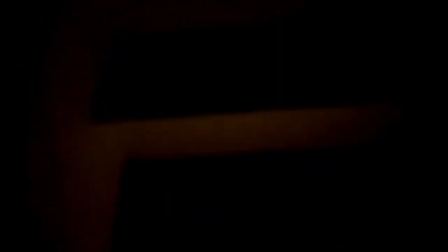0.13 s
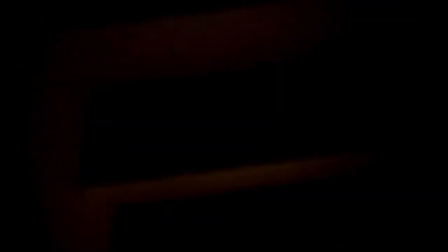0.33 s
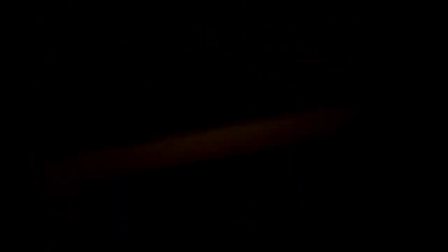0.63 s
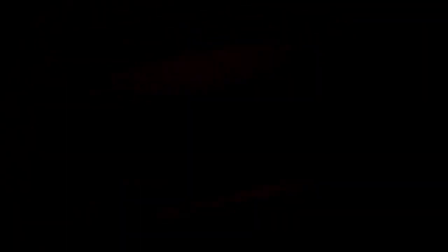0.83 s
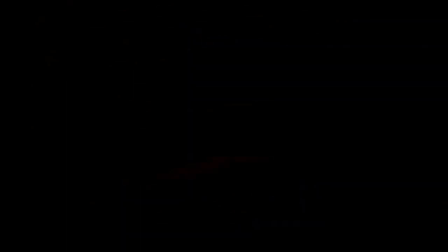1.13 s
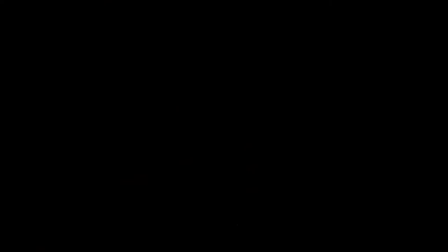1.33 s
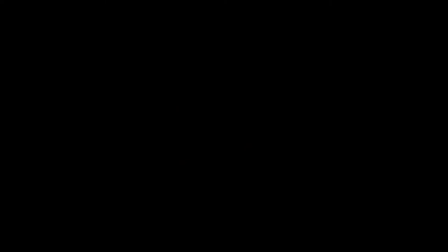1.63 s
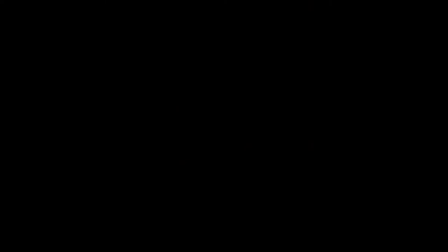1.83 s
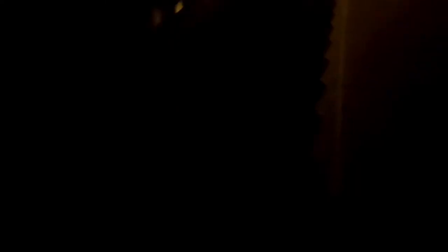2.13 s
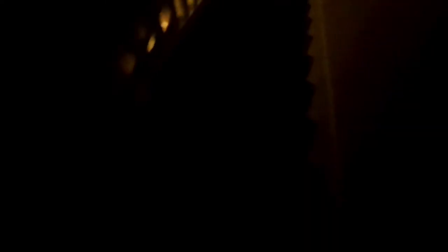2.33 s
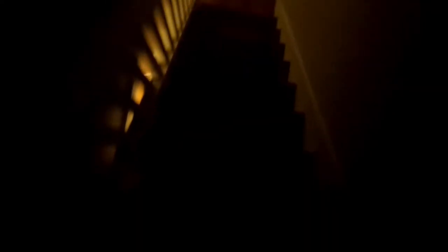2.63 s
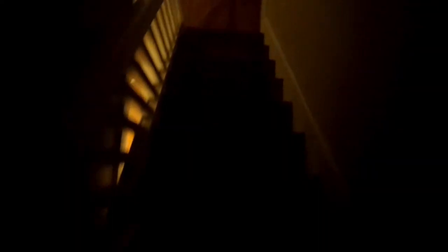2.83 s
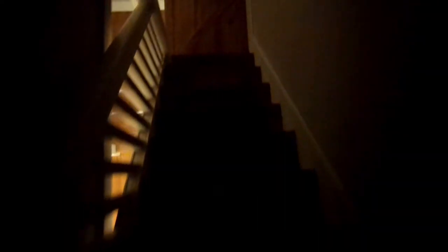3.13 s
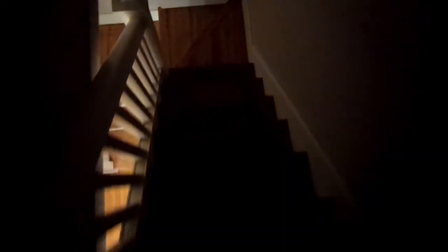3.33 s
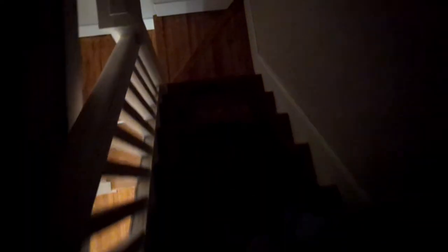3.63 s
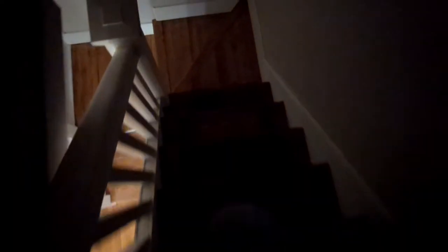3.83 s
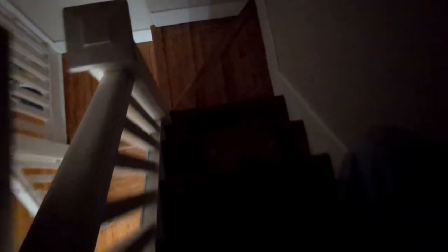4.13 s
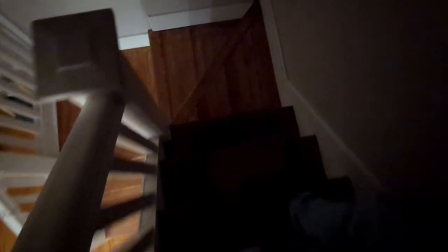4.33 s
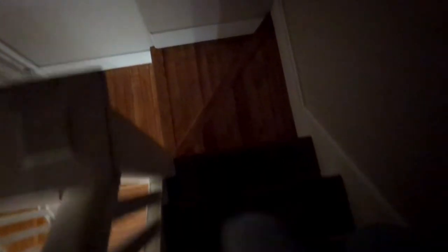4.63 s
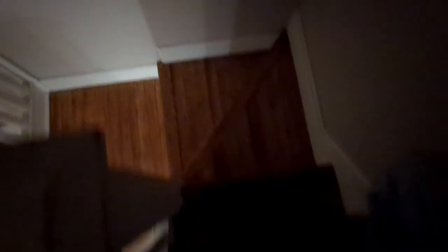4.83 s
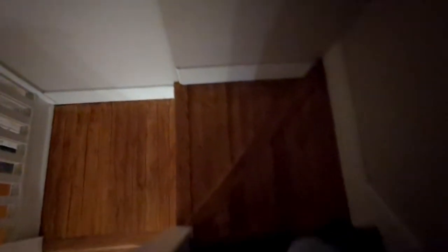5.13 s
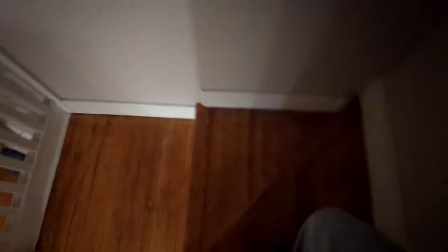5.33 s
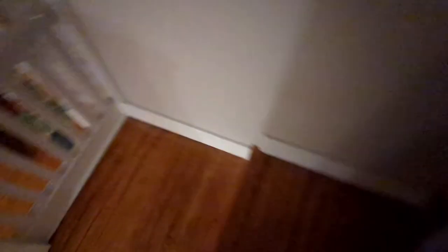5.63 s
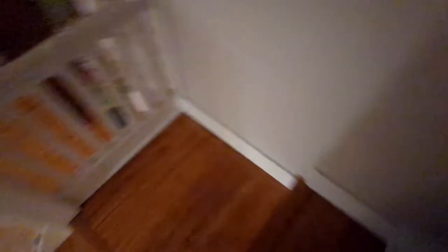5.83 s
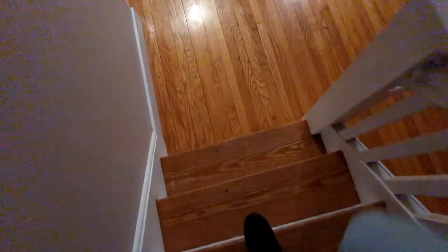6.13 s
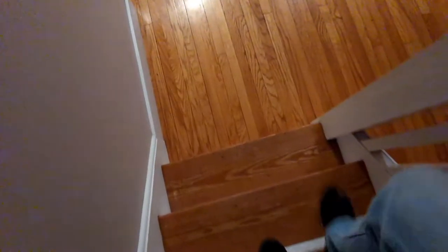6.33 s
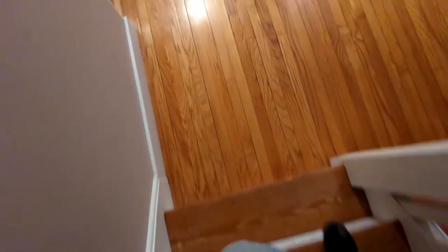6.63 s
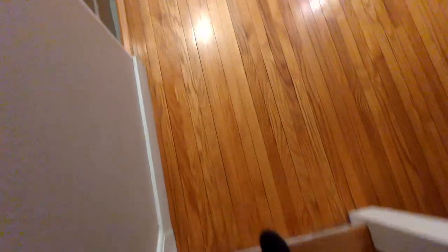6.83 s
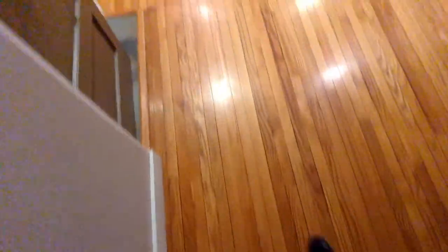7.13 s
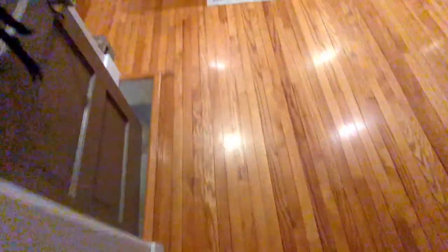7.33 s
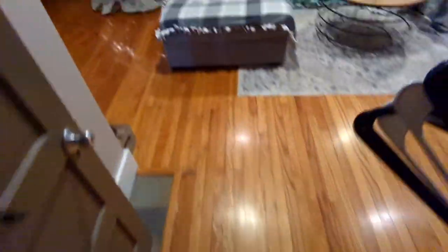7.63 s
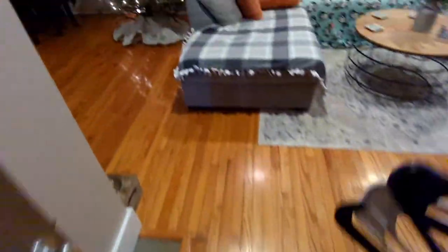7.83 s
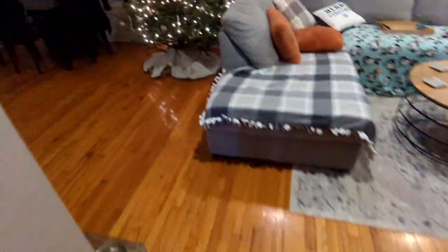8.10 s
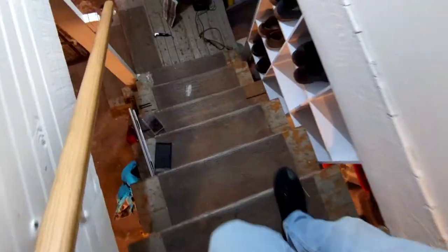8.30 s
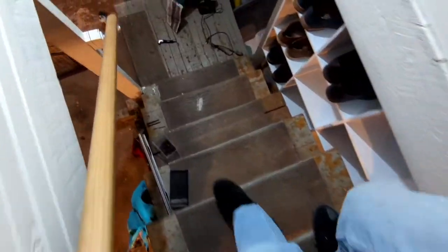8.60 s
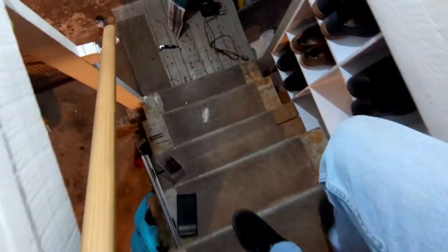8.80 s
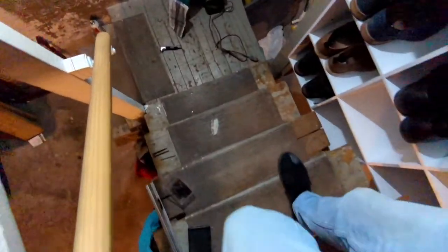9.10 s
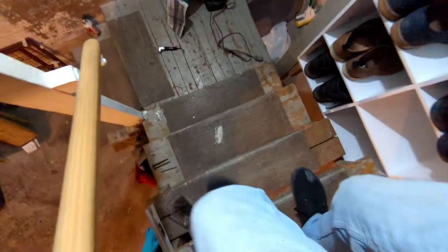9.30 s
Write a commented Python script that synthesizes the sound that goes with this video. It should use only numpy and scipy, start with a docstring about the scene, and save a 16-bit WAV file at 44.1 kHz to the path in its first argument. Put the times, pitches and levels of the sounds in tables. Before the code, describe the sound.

Someone in soft-soled shoes hurries down wooden stairs inside a house. Irregular heel and toe knocks ring hollow boards over low thuds, with gritty scuffs and small sole clicks. A hard cut brings brief near-silence, then more steps, a loud slap with a tiny rubber squeak on the floor, another cut, and faint treads with trouser swishes. Head-worn stereo microphone, short stairwell echo.

```python
"""Hurrying down wooden stairs

Someone in soft shoes hurries down wooden stairs and over a boarded floor, a small stereo camera on the head.
Heels and toes ring damped tread, frame and joist modes; sole edges click; grit and bumps make the drag.
A squeak, trouser swishes and coloured house noise are added, and sparse taps form the stairwell's echo.
Two hard edits join three shots, each with its own background, and cut the echo off."""
import sys
import numpy as np
from scipy import signal
from scipy.fft import rfft, irfft, next_fast_len
from scipy.io import wavfile
from scipy.ndimage import uniform_filter1d

SR = 44100
rng = np.random.default_rng(int(sys.argv[2]) if len(sys.argv) > 2 else 0)


def natural_amplitude(level_db):
    """Convert a level in decibels to a linear amplitude factor, elementwise."""
    exponent = np.asarray(level_db, float) / 20
    return 10 ** exponent


def wav_record(signal):
    """Record a signal, one row per channel, as 16-bit PCM in the file named by sys.argv[1]."""
    frames = np.transpose(np.atleast_2d(signal))
    bounded = np.clip(frames, -1, 1)
    # unit amplitude maps onto the largest positive 16-bit level
    quanta = np.round(bounded * 32767).astype(np.int16)
    wavfile.write(sys.argv[1], SR, quanta)


N = 417186  # length in samples

# All source levels are set ahead of the microphone's colour and the final rounding of peaks.
# Heels and toes landing: start_s, knock_db, thud_db, tread_pitch_hz, frame_share_db [s, dB, dB, Hz, dB]
FOOTFALLS = [(0.002, -12, -26, 195, 5), (0.298, -21, -31, 306, 0), (0.35, -48, -47, 392, -1),
             (0.483, -11.5, -16, 153, 5), (0.523, -7.5, -33, 149.3, 3.5), (0.724, -28, -40, 133, 4),
             (0.743, -30, -25, 240, 0.5), (0.915, -28.5, -36, 130, -3), (0.95, -13, -41, 360, 0),
             (0.99, -31, -23, 360, -3.5), (1.073, -22, -26, 172, 2.5), (1.439, -20, -42, 193, 1),
             (1.485, -30, -17.5, 262, 4), (1.56, -17.5, -26, 174, 0), (1.938, -46, -54, 133, -15),
             (1.963, -17, -50, 202.6, -12), (2.252, -32, -51, 136.3, -14), (2.33, -31.5, -48, 346, 3.5),
             (2.704, -30, -45, 228, -4), (2.843, -37, -58, 265, -5), (2.977, -27, -44, 358, 2),
             (3.115, -17.5, -39, 240, 2), (3.373, -12.5, -37, 312, -1), (3.382, -15, -32, 238, -1),
             (3.454, -32, -48, 314, 0), (3.712, -11, -23, 176.4, -8), (3.734, -17, -21, 173, -2.5),
             (3.844, -23, -31, 188.5, -4.5), (4.046, -10.5, -23, 163, 10), (4.062, -17, -31, 172, -1),
             (4.133, -21, -33, 312, 6), (4.29, -46, -36, 438, -0.5), (4.439, -16, -46, 172, -3.5),
             (4.506, -18, -23, 222, -4), (4.714, -29.5, -56, 223, 3), (4.79, -18, -34, 228, 1),
             (4.939, -27.5, -46, 348, 1.5), (5.151, -12, -43.5, 411, -8), (5.286, -36, -38, 129, 5),
             (5.579, -10.5, -29, 140.5, 5), (5.655, -42, -37, 214, -4.5), (5.822, -38, -63, 357, 2),
             (6.026, -37.5, -48, 430, -5), (6.133, -12.5, -33, 182, 3), (6.175, -16.5, -22, 335, -0.5),
             (6.248, -25.5, -40, 161, -2.5), (6.358, -22.5, -56, 183, -3), (6.426, -25, -50, 165, 10),
             (6.447, -24, -45, 192, 0), (6.511, -11.5, -33, 287, 5), (6.609, -18.5, -25, 165, 14),
             (6.801, -31.5, -57, 172, 13), (6.894, -17.5, -41, 177, 0), (6.961, -21, -27, 173, 19),
             (7.316, -15, -22, 260, 7.5), (7.411, -30, -25, 395, 2), (7.687, -33.5, -55, 199, -10),
             (7.722, -35, -55, 194, -5), (7.787, -52, -18, 135, -8), (7.837, -36, -23, 131, -1),
             (7.983, -50, -36, 176, 15), (8.242, -39, -53, 201, -12), (8.276, -25, -27, 422, 1),
             (8.34, -47, -41, 335, 8), (8.43, -30, -30, 142, 9), (8.676, -18.5, -54, 403, 3),
             (8.909, -43, -54, 334, 3), (9.092, -23, -35, 419, 2.5), (9.403, -31, -48, 133, 7)]
# Modes of a wooden tread: pitch_multiple, level_db [ratio, relative dB]
TREAD_MODES = [(0.801, -5), (1.002, 1), (1.469, -9.5), (2.1, -5.5), (2.9, -13.5), (4.1, -11.5)]
# Deep mode of the joists under the walker: time_s, pitch_hz [s, Hz]
JOIST_PITCH = [(0, 87), (5.4, 94.3), (5.6, 69), (7.6, 54), (8.2, 62), (9.46, 73)]


def evened(x):
    """Scales a sound to rms 1."""
    return x / np.sqrt(np.mean(x ** 2) + 1e-20)


def read(points, hz):
    """Joins (Hz, value) points on a log-frequency axis."""
    point_hz, value = np.transpose(points)
    return np.interp(np.log(hz + 1), np.log(point_hz + 1), value)


def add(mix, start_s, sound):
    """Mixes a sound of matching channels in at start_s, trimmed at the end of the mix."""
    part = mix[:, round(start_s * SR):][:, :sound.shape[1]]
    part += sound[:, :part.shape[1]]


def coloured(x, points):
    """Filters x by a spectral curve of (Hz, dB) points."""
    size = next_fast_len(x.shape[-1])
    gain = natural_amplitude(read(points, np.fft.rfftfreq(size, 1 / SR)))
    return irfft(rfft(x, size) * gain, size)[..., :x.shape[-1]]


def paired(a, b):
    """Two spaced microphones: alike in the bass, nearly unrelated in the treble."""
    # frequency_hz, left_right_likeness [Hz, correlation -1 to 1]
    likeness = [(60, 0.99), (150, 0.99), (300, 0.84), (640, 0.46), (1300, -0.13), (2500, -0.071),
                (15000, 0.07)]
    size = next_fast_len(len(a))
    same = np.clip(read(likeness, np.fft.rfftfreq(size, 1 / SR)), -1, 1)
    other = same * rfft(a, size) + np.sqrt(1 - same ** 2) * rfft(b, size)
    return np.array([a, irfft(other, size)[:len(a)]])


def placed(sound, pan_db):
    """The nearer microphone hears the sound louder and first; the bass stays central in level."""
    lag = int(np.clip(2.5 * pan_db, -16, 16)) // 2  # samples each way
    padded = np.r_[np.zeros(8), sound]
    sides = np.array([np.roll(padded, shift) for shift in (-lag, lag)])
    bass = uniform_filter1d(sides, size=120)
    return bass + (sides - bass) * natural_amplitude(np.array([[pan_db / 2], [-pan_db / 2]]))


def resonate(x, hz, width_hz):
    """One damped mode, ringing as a sine; a wider mode dies sooner."""
    radius, turn = np.exp(-np.pi * width_hz / SR), 2 * np.pi * hz / SR
    feedback = [1, -2 * radius * np.cos(turn), radius * radius]
    return width_hz * signal.lfilter([0, np.sin(turn)], feedback, x)


def following(x, hz, width_hz):
    """A noisy band around a moving pitch: shifted to zero, low-passed, shifted back, rms 1."""
    turn = np.exp(2j * np.pi * np.cumsum(hz) / SR)
    lowpass = signal.butter(2, width_hz / 2, fs=SR, output="sos")
    return evened((turn * signal.sosfilt(lowpass, x / turn)).real)


def microphone(x):
    """Cuts the bass and adds the small resonances of the microphone housing."""
    # resonance_hz, width_hz, lift_db [Hz, Hz, dB]
    ports = [(2020, 190, 1), (4270, 260, 3), (6250, 990, 3.5), (11960, 1240, 2)]
    size = next_fast_len(N)
    hz = np.fft.rfftfreq(size, 1 / SR)
    lift = natural_amplitude(sum(db / (1 + (2 * (hz - f) / width) ** 2) for f, width, db in ports))
    x = signal.sosfilt(signal.butter(3, 73.7, "high", fs=SR, output="sos"), x)  # Hz
    return irfft(rfft(x, size) * lift, size)[..., :N]


def hush(shot):
    """House air and microphone hiss: noise with the spectrum of one shot, its level drifting."""
    # One curve for each shot: frequency_hz, density_db [Hz, relative dB per Hz]
    spectra = [
        [(15, -48), (25, -16), (87, -1), (270, -21), (405, -8.5), (1070, -19), (2050, -18.5), (3720, -30),
         (12200, -36), (16000, -37)],
        [(15, -48), (25, 17.5), (82, 2.5), (141, -3), (223, -16), (516, -4.5), (1040, -15), (2000, -20.5),
         (3520, -25), (9570, -32.5), (12200, -30.5), (16000, -33)],
        [(15, -39), (25, 4), (64, 9), (97, 1), (145, -7), (285, -20), (463, -19), (1190, -20.5), (2000, -49),
         (3620, -36), (12200, -37.5), (16000, -41)],
    ]
    # Background rms: time_s, level_db [s, dB]
    levels = [(0, -48), (1.98, -58), (2, -61), (2.24, -54.5), (2.9, -53.5), (5, -47.5), (8.1, -50.5),
              (8.2, -60), (8.3, -44.5), (9.46, -44.5)]
    air = evened(coloured(paired(*rng.standard_normal((2, N))), spectra[shot]))
    return natural_amplitude(np.interp(np.arange(N) / SR, *np.transpose(levels))) * air


def stairwell():
    """An echo of sparse taps of random sign, each frequency band dying at its own speed."""
    # frequency_hz, decay_t60_s [Hz, s to fall 60 dB]
    decay = [(80, 0.3), (250, 0.16), (700, 0.24), (2000, 0.32), (6000, 0.08), (14000, 0.42)]
    taps = np.zeros((2, SR // 2))
    at = np.arange(150, SR // 2 - 20, 20)
    at = at + rng.integers(0, 20, (2, len(at)))
    np.put_along_axis(taps, at, rng.choice([-1., 1.], at.shape), 1)
    hz, t, bands = signal.stft(paired(*taps), SR, nperseg=512)
    fading = bands * natural_amplitude(-60 * t / read(decay, hz)[:, None])
    tail = signal.istft(fading, SR, nperseg=512)[1]
    return tail / np.linalg.norm(tail[0])


def swish(length_s, level_db, low_hz, noise):
    """A soft puff of high noise, unlike in the two microphones, under a smooth hump."""
    highpass = signal.butter(2, low_hz, "high", fs=SR, output="sos")
    puff = signal.sosfilt(highpass, noise)[:, :round(length_s * SR)]
    return natural_amplitude(level_db) * evened(puff) * np.hanning(puff.shape[1])


def trouser_swishes():
    """Trouser legs brush past each other in short puffs of noise."""
    # start_s, length_s, level_db (rms ahead of the hump), low_hz [s, s, dB, Hz]
    puffs = [(8.359, 0.13, -54.5, 3000), (8.483, .05, -55, 2500), (8.77, .07, -56, 9000),
             (9.171, 0.089, -55.5, 3500)]
    layer = np.zeros((2, N))
    for (start_s, *settings), noise in zip(puffs, rng.standard_normal((len(puffs), 2, 8192))):
        add(layer, start_s, swish(*settings, noise))
    return layer


def squeak():
    """Rubber sticks and slips on varnish: a short gliding tone with two overtones."""
    # time_s, pitch_hz, level_db (rms of the fundamental) [s, Hz, dB]
    glide = [(7.27, 1290, -66), (7.285, 1350, -60), (7.305, 1300, -48), (7.318, 1330, -46)]
    s, hz, db = np.transpose(glide)
    t = np.arange(s[0], s[-1], 1 / SR)
    turns = 2 * np.pi * np.cumsum(np.interp(t, s, hz)) / SR
    tone = np.sin(turns) + 0.15 * np.sin(2 * turns) + 0.2 * np.sin(3 * turns)
    tone = np.sqrt(2) * natural_amplitude(np.interp(t, s, db)) * tone * signal.windows.tukey(len(t), 0.4)
    layer = np.zeros((2, N))
    add(layer, s[0], np.outer([1, 1], tone))
    return layer


def click(peak_db, bright, fade_s, pan_db, noise):
    """A crack of noise, between a dull slap and a hard tick, dying exponentially."""
    # Both curves: frequency_hz, density_db [Hz, relative dB per Hz]
    dull_slap = [(300, -40.5), (600, 5.5), (1000, 1.5), (2000, 6.5), (3000, -9), (5000, -36),
                 (16000, -38.5)]
    hard_tick = [(600, -19), (1500, -10), (3000, -2), (6000, -6), (10000, -11.5), (16000, -17.5)]
    t = np.arange(len(noise)) / SR
    slap, tick = evened(coloured(noise, dull_slap)), evened(coloured(noise, hard_tick))
    crack = (1 - bright) * slap + bright * tick
    crack = crack * np.exp(-t / fade_s) * (1 - np.exp(-t / 0.0004))  # 0.4 ms attack
    return placed(natural_amplitude(peak_db) * crack / abs(crack).max(), pan_db)


def sole_clicks():
    """The edges of the soles click in brief cracks."""
    # start_s, peak_db, brightness, fade_s, left_minus_right_db [s, dB, 0-1, s, dB]
    edges = [(0.1271, -27.5, 0.1, 0.0046, -4), (0.2907, -32, 0.4, 0.007, -2), (0.3496, -31, 0.1, 0.031, -9),
             (0.4953, -35, 0.14, 0.005, -9), (0.7457, -40, 0, 0.0045, -4), (0.952, -30, 0, 0.005, 5),
             (0.992, -24.5, 0.24, 0.025, 2.5), (1.0745, -31, 0, 0.0063, -3.5),
             (1.4346, -51, 0, 0.0044, -12), (1.461, -29.5, 0.15, 0.017, -1.5),
             (1.4823, -27.5, 0.18, 0.0084, 0), (1.939, -28.5, 0.25, 0.0012, -3),
             (1.9609, -21, 0.13, 0.0028, -3.5), (2.3311, -34, 0.07, 0.0048, 3.5),
             (2.7043, -36, 0.3, 0.0043, 4), (2.8434, -37, 0, 0.0081, -4), (2.988, -33, 0.3, 0.0038, -5),
             (3.3722, -12.5, 0.09, 0.003, 2.5), (3.454, -24, 0.24, 0.005, -2),
             (3.4624, -27.5, 0.25, 0.015, 5), (3.52, -31, 0.56, 0.0095, -1.5), (3.712, -17, 0.2, 0.005, 5),
             (3.8449, -29, 0.1, 0.0027, 18), (4.0467, -20.5, 0.08, 0.029, -3.5),
             (4.131, -15.5, 0.13, 0.0044, 3.5), (4.2921, -35, 0.34, 0.0045, -0.5),
             (4.405, -32, 0.7, 0.005, -2.5), (4.4184, -30.5, 1, 0.0077, 6), (4.4998, -16, 0.6, 0.0024, 6.5),
             (4.778, -38, 0.14, 0.0031, -1.5), (4.9387, -25.5, 0.16, 0.0034, 2),
             (5.132, -59, 0.5, 0.0027, -3), (5.153, -38, 0.8, 0.0054, -0.5), (5.2844, -22, 0.73, 0.0026, 4),
             (5.5633, -31, 0.1, 0.0056, 3.5), (5.5757, -27, 0.03, 0.0028, 4),
             (5.6545, -30, 0.5, 0.0049, 3.5), (5.8262, -35, 0.2, 0.0095, 0),
             (6.0247, -39.5, 0.36, 0.0029, -1.5), (6.0751, -48, 0.1, 0.0031, -4),
             (6.1325, -23.5, 0, 0.0041, 2.5), (6.1564, -47, 0.6, 0.0048, 5.5),
             (6.251, -32, 0.3, 0.0023, 14), (6.3587, -31.5, 0.27, 0.0035, 8),
             (6.4462, -38, 0.54, 0.0046, 2), (6.451, -29, 0.43, 0.0024, -2), (6.5066, -30, 0.2, 0.0058, 10),
             (6.8037, -34, 0.12, 0.005, 6), (6.8944, -39, 0.4, 0.005, 7), (6.935, -25, 0.42, 0.0043, 5),
             (6.9593, -23.5, 0.64, 0.004, 3), (7.2095, -52, 0.1, 0.0036, 0.5),
             (7.3173, -12, 0.05, 0.0059, 3.5), (7.4126, -26, 0.04, 0.0078, -2.5),
             (7.683, -57, 0.2, 0.005, -0.5), (7.9189, -36, 0.15, 0.004, 2.5), (7.987, -48, 0.2, 0.0038, 9),
             (8.243, -31.5, 0, 0.006, 2), (8.2751, -29, 0.38, 0.0046, 1), (8.3417, -38, 0.17, 0.0064, -2.5),
             (8.5133, -36.5, 0.94, 0.013, 6.5), (8.6737, -29, 0.07, 0.0047, 3),
             (8.7532, -22.5, 0.88, 0.0022, -5.5), (8.7914, -36, 0.3, 0.005, 3),
             (8.9092, -42, 0.3, 0.0064, 6.5), (9.092, -36, 0.34, 0.004, -2)]
    layer = np.zeros((2, N))
    for (start_s, *settings), noise in zip(edges, rng.standard_normal((len(edges), 2048))):
        add(layer, start_s, click(*settings, noise))
    return layer


def frame(x):
    """The stair frame answers a force with its broad low modes."""
    # pitch_hz, width_hz, level_db [Hz, Hz, relative dB]
    modes = [(172, 25.7, 8.5), (240, 48, 6), (330.7, 23, -1.5), (394, 147, 4.5), (514, 160, -1),
             (650, 96, -13.5)]
    return sum(natural_amplitude(db) * resonate(x, hz, width) for hz, width, db in modes)


def slides(t):
    """Levels in each slide: scrape and fizz rise, rumble falls; then all fade into the shuffle."""
    # Faint shuffle between the steps: time_s, scrape_db, fizz_db, rumble_db [s, dB, dB, dB]
    shuffle = [(0, -64, -73, -48), (1.9, -95, -70, -73), (2.3, -69.5, -73, -71), (3.3, -71, -62, -57),
               (4, -63, -56.5, -55), (5.1, -69, -67, -57), (5.6, -62, -59, -50), (6.1, -59, -63.5, -70),
               (6.5, -73, -63, -48), (7.2, -65, -67.5, -62.5), (7.7, -61, -65.5, -53),
               (8.15, -68, -85, -72), (8.6, -65, -58.5, -63), (9.46, -62, -71.5, -54.5)]
    # A sole sliding and rolling: start_s, length_s, scrape_db, fizz_db (cloth and sole),
    # rumble_db (boards) [s, s, dB, dB, dB], levels as the slide ends
    sliding = [(0.0, 0.022, -37.5, -82, -21.5), (0.11, 0.028, -51, -57, -33), (0.288, 0.032, -50, -53, -35),
               (0.342, 0.022, -44, -51, -38.5), (0.424, 0.023, -43, -56, -40.5),
               (0.481, 0.075, -31.5, -48, -25.5), (0.749, 0.049, -41, -58, -36),
               (0.946, 0.065, -34.5, -47.5, -23), (1.042, 0.065, -45, -55, -38),
               (1.434, 0.046, -43.5, -59, -29), (1.493, 0.06, -29.5, -40, -24.5),
               (1.962, 0.012, -38, -50.5, -21.5), (2.249, 0.057, -67, -63.5, -43.5),
               (2.323, 0.033, -58, -60.5, -43.5), (2.48, 0.017, -71, -84, -59),
               (2.699, 0.015, -52, -53, -40.5), (2.838, .02, -52, -77, -41),
               (2.974, 0.018, -43, -64, -27.5), (2.988, 0.049, -34.5, -39, -37),
               (3.051, 0.065, -30.5, -35.5, -32.5), (3.376, 0.022, -32, -41.5, -21),
               (3.456, 0.044, -46, -47.5, -36.5), (3.701, .01, -42, -43, -25.5),
               (3.713, 0.019, -29, -37, -20.5), (3.842, 0.005, -35.5, -39, -24),
               (4.044, 0.054, -33, -42.5, -25), (4.127, 0.03, -35.5, -45, -28.5),
               (4.163, 0.046, -64, -72, -33), (4.29, 0.01, -45.5, -68, -41.5),
               (4.406, 0.026, -35.5, -45, -39.5), (4.44, 0.038, -39, -56, -25.5),
               (4.501, 0.012, -28.5, -36.5, -24.5), (4.778, .012, -40, -56, -40),
               (4.787, 0.029, -36.5, -49, -27.5), (4.924, 0.01, -39, -47.5, -50),
               (4.934, 0.0079, -45, -54, -29), (5.127, 0.014, -40.5, -49, -37),
               (5.153, 0.01, -44, -58, -19), (5.284, 0.0067, -34.5, -44.5, -29),
               (5.559, .015, -44, -47, -33), (5.57, 0.025, -37.5, -46.5, -24),
               (5.651, 0.0073, -32.5, -41, -28), (5.815, 0.016, -46.5, -46.5, -40),
               (6.021, 0.015, -52, -78, -53), (6.131, 0.062, -52, -52.5, -27.5),
               (6.245, .01, -67, -58, -32), (6.353, 0.0088, -58, -68, -42), (6.42, 0.022, -54, -58, -35),
               (6.501, 0.049, -47, -54.5, -25.5), (6.588, 0.024, -50, -51, -31.5),
               (6.89, 0.025, -55, -61, -29.5), (6.921, 0.068, -53, -49.5, -36),
               (7.313, 0.054, -39, -49.5, -31.5), (7.681, 0.12, -58, -59.5, -51),
               (7.8, 0.22, -55.5, -62.5, -59), (8.189, 0.08, -70, -61, -56.5),
               (8.267, 0.0086, -57, -51, -33), (8.347, 0.089, -62, -57, -47),
               (8.505, 0.016, -54, -60, -50.5), (8.672, 0.021, -52, -53, -32),
               (8.746, 0.009, -54, -52, -45.5), (8.883, 0.11, -62, -73, -56.5),
               (9.09, 0.035, -56, -66, -36.5), (9.176, 0.031, -54.5, -58.5, -56),
               (9.405, 0.029, -64, -78, -43.5)]
    # Change while the sole slides: scrape and fizz rise, rumble falls [dB per s]
    change = [39, 18, -30.5]
    # Fall once it has stopped: scrape, fizz, rumble [dB per s]
    fade = [197, 196, 185]
    s, *columns = np.transpose(shuffle)
    power = np.array([natural_amplitude(2 * np.interp(t, s, column)) for column in columns])
    for start_s, length_s, *db in sliding:
        age = np.arange(SR // 2) / SR - length_s  # negative until the slide ends
        shape = np.outer(change, np.minimum(age, 0)) - np.outer(fade, np.maximum(age, 0))
        add(power, start_s, natural_amplitude(2 * (np.c_[db] + shape)))
    return np.sqrt(power)


def shake():
    """Level of the joists shaking on after each thud, renewed by every footfall."""
    below_thud_db, t60_s = -11, 0.35
    fall_db = -60 * np.arange(SR // 2)[None] / SR / t60_s
    power = np.zeros((1, N))
    for start_s, _, thud_db, *_ in FOOTFALLS:
        add(power, start_s, natural_amplitude(2 * (thud_db + below_thud_db + fall_db)))
    return np.sqrt(power)


def drag():
    """Dense grit under the sole scrapes and fizzes; soft bumps shake tread, frame and joists."""
    # Both curves: frequency_hz, density_db [Hz, relative dB per Hz]
    scrape_colour = [(410, -33), (700, -4.5), (997, -7), (1630, -5), (1760, -9), (1970, -9.5),
                     (5000, -33.5), (6500, -60), (11000, -120)]
    fizz_colour = [(2350, -0.5), (4000, -3), (4650, -5), (5900, -5), (9440, -12), (13100, -12.5),
                   (16000, -23.5)]
    grains_per_s, bumps_per_s = 14000, 1500
    grain_db, clump_db = 2.36, 1.0  # spread of grain sizes, and of their slower clumping
    tread_width_hz, joist_width_hz = 60, 45

    t = np.arange(N) / SR
    levels = np.r_[slides(t), shake()]
    # soft soles: a 2 ms rise
    scrape, fizz, rumble, deep = signal.lfilter([1 / 90], [1, 1 / 90 - 1], levels)

    sizes = natural_amplitude(grain_db * np.minimum(rng.exponential(1, N), 4))
    clumps = evened(uniform_filter1d(rng.standard_normal(N), size=500))
    sizes *= natural_amplitude(clump_db * clumps)  # grit catches in clumps
    grains = rng.standard_normal((2, N)) * sizes * (rng.random((2, N)) < grains_per_s / SR)
    grit = paired(*grains)
    bumps = paired(*rng.standard_normal((2, N)) * (rng.random(N) < bumps_per_s / SR))
    bumps = signal.sosfilt(signal.butter(2, 1200, fs=SR, output="sos"), bumps)  # Hz

    landed_s, tread_hz, frame_db = np.transpose(FOOTFALLS)[[0, 3, 4]]
    under_foot = np.maximum(np.searchsorted(landed_s, t) - 1, 0)  # the tread last stepped on
    pitch = tread_hz[under_foot]
    tread = sum(natural_amplitude(db) * following(bumps, k * pitch, k * tread_width_hz) for k, db in TREAD_MODES[:3])
    # frame over tread: twice the footfall's share in dB, plus 8 dB
    share = uniform_filter1d(natural_amplitude(2 * frame_db[under_foot] + 8), size=200)
    boards = (share * evened(frame(bumps)) + evened(tread)) / np.hypot(share, 1)
    joists = following(bumps[0], np.interp(t, *np.transpose(JOIST_PITCH)), joist_width_hz)

    scraping = scrape * evened(coloured(grit, scrape_colour))
    fizzing = fizz * evened(coloured(grit, fizz_colour))
    return scraping + fizzing + rumble * boards + deep * joists


def footfall(start_s, knock_db, thud_db, hz, frame_db, noise):
    """A short rough push rings tread and frame; the body's weight sinks into the joists."""
    push_s, thud_rise_s, thud_t60_s = 0.0011, 0.011, 0.24
    ring_cycles = 20.4  # cycles of the tread pitch to fall 60 dB; higher modes die sooner
    t = np.arange(len(noise)) / SR
    tread = sum(natural_amplitude(db - 60 * k * hz * t / ring_cycles) * np.sin(2 * np.pi * hz * k * t)
                for k, db in TREAD_MODES)
    shaken = frame(t * np.exp(-t / push_s) * (1 + 5.9 * noise))
    knock = tread * (1 - np.exp(-t / push_s)) + natural_amplitude(frame_db) * shaken / abs(shaken).max()
    joist_hz = np.interp(start_s, *np.transpose(JOIST_PITCH))
    envelope = natural_amplitude(-60 * t / thud_t60_s) * (1 - np.exp(-t / thud_rise_s))
    thud = envelope * np.sin(2 * np.pi * joist_hz * t)
    sound = natural_amplitude(knock_db) * knock / abs(knock).max() + natural_amplitude(thud_db) * thud
    return placed(sound, noise[0])  # a random pan of about 1 dB


def footfalls():
    """Every heel and toe lands with its own knock and thud."""
    layer = np.zeros((2, N))
    for row, noise in zip(FOOTFALLS, rng.standard_normal((len(FOOTFALLS), 8192))):
        add(layer, row[0], footfall(*row, noise))
    return layer


def scene():
    """Joins three shots; two echo tails alternate smoothly, and each edit cuts the echo off."""
    # start_s, end_s [s, s]
    shots = [(0, 1.9865), (1.9865, 8.178), (8.189, 9.46)]
    steps_wet_db, drag_wet_db = -3, -7
    steps = microphone(footfalls() + sole_clicks() + squeak() + trouser_swishes())
    soles = microphone(drag())
    still = slice(round(shots[1][0] * SR), round(2.245 * SR))  # the second shot opens on stillness
    steps[:, still] = soles[:, still] = 0

    send = (natural_amplitude(steps_wet_db) * steps + natural_amplitude(drag_wet_db) * soles).mean(0)
    turn = np.pi * np.arange(N) / SR / 0.7  # half a turn every 0.7 s
    tails = [stairwell(), stairwell()]
    sends = [np.sin(turn) * send, np.cos(turn) * send]

    out = np.zeros((2, N))
    for number, (start_s, end_s) in enumerate(shots):
        shot = slice(round(start_s * SR), min(round(end_s * SR), N))
        out[:, shot] = (steps + soles + microphone(hush(number)))[:, shot]
        for sent, tail in zip(sends, tails):
            echo = signal.oaconvolve(sent[None, shot], tail, axes=1)
            out[:, shot] += echo[:, :shot.stop - shot.start]
    return out


def roll_off(x):
    """The treble ends steeply here."""
    return signal.sosfilt(signal.butter(12, 16810, fs=SR, output="sos"), x)


def record(dry):
    """Rounds peaks off softly, then limits the band."""
    ceiling, edge_hz = 0.9, 16100
    x = ceiling * np.tanh(dry / ceiling)
    lowpass = signal.firwin(511, edge_hz, window=("kaiser", 9), fs=SR)
    x = signal.oaconvolve(x, lowpass[None], "same")
    return roll_off(x)


dry = scene()
out = record(dry)
wav_record(out)
```